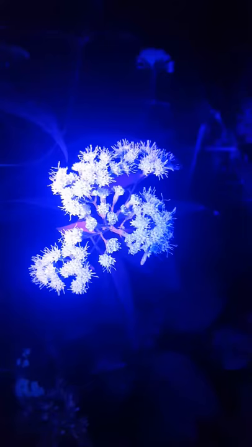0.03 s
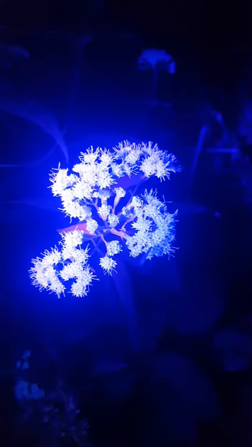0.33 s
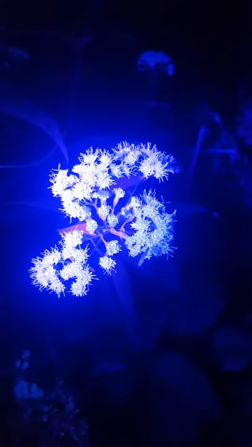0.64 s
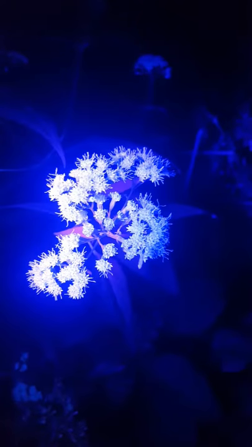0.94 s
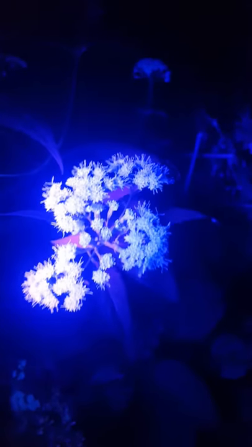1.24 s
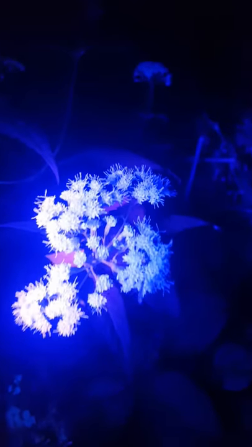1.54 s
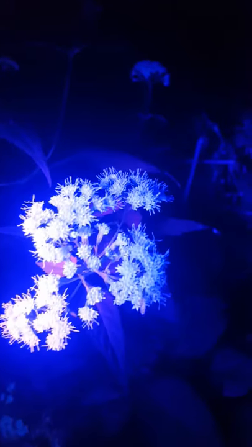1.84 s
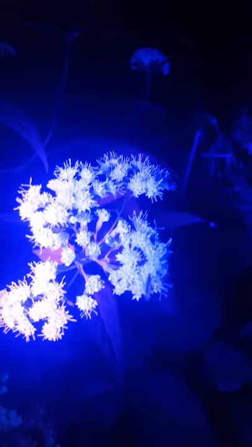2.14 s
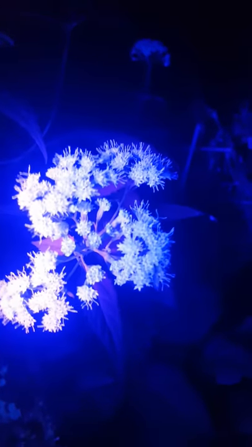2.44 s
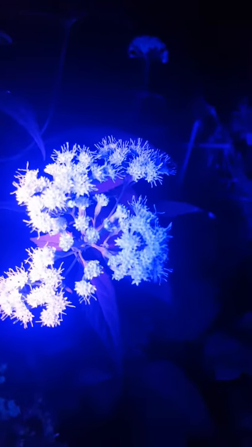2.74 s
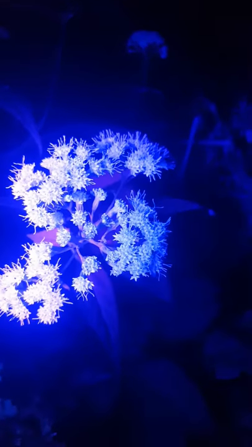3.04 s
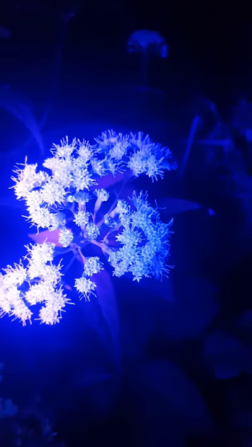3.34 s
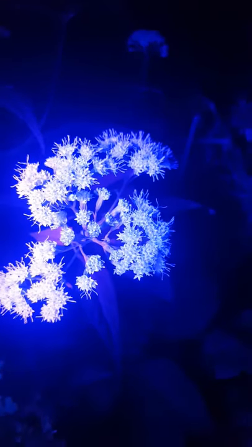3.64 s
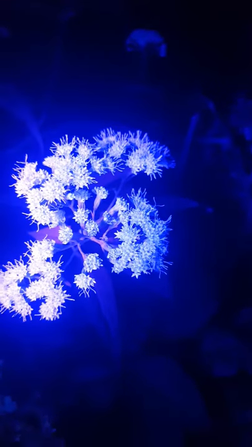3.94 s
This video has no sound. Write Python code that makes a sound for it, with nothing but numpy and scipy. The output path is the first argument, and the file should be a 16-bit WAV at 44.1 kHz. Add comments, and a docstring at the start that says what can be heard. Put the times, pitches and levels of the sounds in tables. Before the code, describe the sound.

A dense chorus of crickets trills throughout, over a faint hiss of katydids and a low rumble of distant traffic. Nearer crickets add brief trills, mostly on the left, from about 0.3 to 1.7 seconds, 2.3 to 3.1, and after 3.5. A katydid ticks three times around 2 seconds, then buzzes thinly until near the end. Another scrapes briefly at 1.3 and 2.9 seconds. Soft taps dot the leaves.

```python
"""Two crowds of crickets trill in the night: tree crickets near 2.7 kHz, ground crickets near 5 kHz.
Each stroke of their wings makes a short tone, and nearer crickets stand out in brief trills.
A meadow katydid scrapes its wings near 12 kHz: it buzzes, rests, ticks three times and buzzes again.
Another katydid lisps twice, and soft taps sound among the leaves, which scatter the nearer sounds.
Far katydids hiss all the while, and distant traffic rumbles underneath."""
import sys
import numpy as np
from scipy import signal
from scipy.io import wavfile

SR = 44100
rng = np.random.default_rng(int(sys.argv[2]) if len(sys.argv) > 2 else 0)


def materialize(psi):
    """Save the field psi as 16-bit PCM at rate SR to the path in sys.argv[1].

    A 1-D psi becomes a single channel; in a 2-D psi each row is a channel.
    """
    bounded = np.clip(np.atleast_2d(psi).T, -1, 1)
    quanta = np.round(bounded * 32767).astype(np.int16)
    wavfile.write(sys.argv[1], SR, quanta)


N = 176400
T = np.arange(N) / SR

# How loud each cricket crowd is across its pitches: f/Hz, relative level/dB
TREE_CROWD = [(2230, -15), (2310, -7), (2420, -2.5), (2550, -2.5), (2720, -2), (2900, -4), (3080, -5.5),
              (3250, -8.5), (3350, -12.5)]
GROUND_CROWD = [(4000, -36.5), (4250, -19.5), (4450, -16.5), (4650, -7), (4830, -4), (5050, -1.5),
                (5250, -1.5), (5550, -5.5), (5800, -16.5), (6000, -16), (6350, -17.5), (6600, -28),
                (6950, -31)]
# Steady crickets: f/Hz, strokes/Hz, level/dB, pan/dB (left minus right), phase wander/rad
SINGERS = [(2422, 60, -58.5, -7, 1.5), (2720, 60.5, -49.5, -5, 1.7), (3121, 43, -60.5, -3, 1.2),
           (3215, 94, -58.5, -6, 1.1), (5170, 69, -54, -9, 2.2), (6385, 50, -67, -6, 1.5),
           (6765, 45, -74, 3, 1.7)]
# The meadow katydid's buzzes: start t/s, end t/s, rise t/s, level/dB
BUZZES = [(-.3, 0.203, .1, -57), (2.118, 3.85, 0.25, -57.5)]
# Its single ticks: t/s, level/dB
TICKS = [(1.974, -53), (2.052, -52), (2.142, -52.5)]
# Where its wing rings: f/Hz, width/Hz, relative level/dB, depth of pulsing (0-1)
WING_RINGS = [(11960, 400, -6.5, 0.2), (12450, 1100, -4, 0), (13500, 1600, -10, 0)]
# Tone colour of the far katydids' hiss: f/Hz, relative level/dB
HISS_COLOUR = [(7000, 16), (7600, -29), (8300, -7.5), (9000, -24), (9800, -5), (10800, 4), (11800, 3.5),
               (12600, -1), (13600, 0), (15000, -3), (15900, -10)]
# Its loudness over time: t/s, level/dB
HISS_LEVEL = [(0, -61), (.5, -66), (1, -64.5), (1.5, -63), (1.85, -65.5), (2.5, -65), (3.7, -67), (4, -64)]
# Which way hiss and lisps lean: f/Hz, pan/dB
HISS_PAN = [(7500, 17), (9500, -7), (11000, -2), (12000, 0), (13000, 4), (15500, 4)]
# Tone colours of night air, traffic rumble and a swell of traffic: f/Hz, relative level/dB
AIR_COLOUR = [(200, -17.5), (290, -1.5), (390, -5), (580, -1.5), (940, -6.5), (1500, -9), (2100, -12.5),
              (3600, -10.5), (5000, -40), (7000, -54)]
RUMBLE_COLOUR = [(20, -33), (32, -37), (48, -9), (64, -5.5), (95, 4), (124, -9), (146, -0.5), (177, -10.5),
                 (240, -21.5)]
SWELL_COLOUR = [(170, 7), (250, 1), (400, 2.5), (560, -6.5)]
# Loudness of rumble and swell over time: t/s, level/dB
RUMBLE_LEVEL = [(0, -46.5), (.5, -46.5), (1.6, -46), (1.8, -49), (2.25, -45), (3, -44), (4, -45)]
SWELL_LEVEL = [(0, -59.5), (1.55, -58.5), (1.7, -52), (1.8, -63), (2.9, -78), (3.2, -59), (3.75, -56.5),
               (4, -60)]
# Which way air and traffic noise lean: f/Hz, pan/dB
LOW_PAN = [(30, 2.5), (130, -2), (250, 0), (500, 1), (1000, -1.5), (4000, -7)]
# How alike noise is at the two ears: f/Hz, likeness (0-1)
EAR_LIKENESS = [(30, 0.98), (130, 0.98), (250, 0.68), (500, 0.65), (1000, 0.12), (2500, .05),
                (15000, 0.084)]
# The drones of two distant engines: t/s, f/Hz, level/dB
LOW_ENGINE = [(0, 120, -46.5), (1.1, 120.6, -56.5), (1.35, 122.9, -48.5), (1.8, 123, -57),
              (2.25, 121, -47.5), (2.8, 120, -48), (3.2, 113, -48.5), (3.75, 107, -50), (4, 99.4, -52)]
HIGH_ENGINE = [(0, 158.9, -51), (.5, 166, -51.5), (1, 171.5, -55.5), (1.7, 164.4, -59), (2.3, 162, -84),
               (2.8, 153.5, -59), (4, 153.3, -66)]
# A farther cricket's low chirps, and near crickets' trills: start t/s, length/s, f/Hz, level/dB, pan/dB
CHIRPS = [(0.294, .32, 4120, -57.5, -4), (.73, 0.44, 4360, -56, 5), (1.305, .4, 4250, -61, -1),
          (1.87, .42, 4100, -59, -5), (2.402, .42, 4340, -55, 8), (2.93, 0.3, 4260, -58, -9)]
TRILLS = [(.31, 0.29, 4940, -46, -13), (0.63, 0.41, 4920, -40.5, -10), (1.03, 0.27, 4840, -45, -15),
          (1.298, 0.4, 5000, -38.5, -6), (1.37, .31, 4890, -53, -8), (1.34, 0.35, 4520, -51, -1),
          (2.268, 0.39, 4830, -44, -10), (2.416, 0.3, 4960, -40, -6), (2.68, 0.41, 4930, -46, -10),
          (3.55, 0.46, 5035, -41, -19), (3.745, 0.35, 4830, -45, -1)]
# Soft taps among the leaves: t/s, f/Hz, level/dB
TAPS = [(1.155, 1650, -58), (1.617, 1410, -56), (2.03, 870, -48.5), (2.197, 790, -50), (2.326, 1150, -55),
        (3.016, 705, -49), (3.035, 970, -62), (3.553, 1560, -54), (3.952, 11840, -62.5)]
# The second katydid's lisps: peak t/s, relative level/dB
LISPS = [(1.349, -47), (2.923, -45.5)]
# Their tone colour: f/Hz, relative level/dB
LISP_COLOUR = [(5500, -25), (7000, -3), (7900, 0), (9000, -5), (10200, -2), (11800, -1), (12800, -6),
               (14000, -16), (15500, -24)]


def from_db(db):
    """Turn decibels into a number to multiply by."""
    return 10 ** (np.asarray(db) / 20)


def rms_one(x):
    """Scale a signal so that its typical size (rms) is 1."""
    return x / np.sqrt(np.mean(x ** 2) + 1e-20)


def in_time(rows):
    """Join a table's points with straight lines: one curve for each column after the time."""
    times, *columns = np.transpose(rows)
    return [np.interp(T, times, column) for column in columns]


def at_hz(rows, hz):
    """Look up a table's value at one pitch, with octaves evenly spaced."""
    pitches, values = np.transpose(rows)
    return np.interp(np.log(hz), np.log(pitches), values)


def drift(rate_hz):
    """A smooth random wobble of size about 1; a higher rate wobbles faster."""
    step, warm_up = 40, 2000
    r = np.exp(-2 * np.pi * rate_hz * step / SR)
    noise = rng.standard_normal(N // step + warm_up + 2)
    slow = signal.lfilter([1], [1, -2 * r, r * r], noise)[warm_up:]
    return np.interp(np.arange(N) / step, np.arange(len(slow)), rms_one(slow))


def panned(pan_db):
    """Lean a sound left (+) or right (-), keeping its total power."""
    return rms_one(from_db([[pan_db / 2], [-pan_db / 2]]))


def gate(start, end, rise=.08, fall=.08):
    """Fade in, hold and fade out; times are in seconds."""
    return np.clip((T - start) / rise, 0, 1) * np.clip((end - T) / fall, 0, 1)


def blip(peak_s, width_s):
    """A quick, bell-shaped rise and fall."""
    return np.exp(-.5 * ((T - peak_s) / width_s) ** 2)


def ring(x, hz, width_hz, edge_cut=1):
    """Make x ring around one pitch; an edge_cut of 1 removes the very lowest and highest pitches."""
    r = np.exp(-np.pi * width_hz / SR)
    return signal.lfilter([1, 0, -edge_cut], [1, -2 * r * np.cos(2 * np.pi * hz / SR), r * r], x)


def banded_noise(colour, pan, flicker_db, bands):
    """Stereo noise made of pitch bands that each flicker on their own."""
    edges = np.geomspace(colour[0][0], colour[-1][0], bands + 1)
    white = rng.standard_normal((2, 2, N))
    out = 0
    for k, (low, high) in enumerate(zip(edges, edges[1:])):
        band = signal.butter(2, [low, high], "band", fs=SR, output="sos")
        shared, opposite = signal.sosfilt(band, white[k % 2])
        hz = np.sqrt(low * high)
        alike = at_hz(EAR_LIKENESS, hz)
        gain = from_db(at_hz(colour, hz) + flicker_db * drift(12.3)) * panned(at_hz(pan, hz))
        out += gain * (np.sqrt(1 + alike) * shared + np.sqrt(1 - alike) * opposite * [[1], [-1]])
    return rms_one(out)


def leaves(x, echo_db, decay_s=.78):
    """Countless tiny echoes off the leaves, different at each ear, fading at 60 dB per decay_s."""
    t = T[:SR // 2]
    echoes = rng.standard_normal((2, len(t))) * from_db(-60 * t / decay_s)
    echoes /= np.sqrt(np.sum(echoes ** 2, axis=1, keepdims=True))
    x = x * np.ones((2, 1))
    wet = from_db(echo_db)
    return (x + wet * signal.fftconvolve(x, echoes, axes=1)[:, :N]) / np.hypot(1, wet)


def cricket(hz, strokes_per_s, duty, sag, unsteady):
    """Each wing stroke is a short tone that sags in pitch; duty is the share of time it sounds."""
    strokes = np.cumsum(strokes_per_s * (1 + unsteady * drift(3.98))) / SR + rng.random()
    progress = np.minimum(strokes % 1 / duty, 1)
    # each stroke reaches each ear at a random point in its wave
    offsets = rng.uniform(0, 2 * np.pi, (2, N // 200))[:, strokes.astype(int)]
    phase = 2 * np.pi * np.cumsum(hz * (1 + sag * (.5 - progress))) / SR
    return rms_one(np.sin(np.pi * progress) * np.sin(phase + offsets))


def cricket_crowd(loudness, strokes_per_s, duty, sag, swell_db, count):
    """Many crickets spread over a range of pitches, each with its own tempo and slow swell."""
    out = 0
    for hz in np.linspace(loudness[0][0], loudness[-1][0], count):
        song = cricket(hz, strokes_per_s * rng.uniform(.6, 1.4), duty, sag, unsteady=.03)
        out += song * from_db(at_hz(loudness, hz) + swell_db * drift(4.1))
    return rms_one(out)


def ringing_cricket(hz, strokes_per_s, depth, wander_rad):
    """Strokes run together into one throbbing tone, whose wave shifts on the way to each ear."""
    strokes = np.cumsum(strokes_per_s * (1 + .024 * drift(5))) / SR + rng.random()
    wander = wander_rad * np.array([drift(14), drift(14)]) + rng.uniform(0, 2 * np.pi, (2, 1))
    throb = 1 + depth * np.cos(2 * np.pi * strokes)
    return rms_one(throb * np.sin(2 * np.pi * hz * T + wander))


def steady_crickets():
    """Seven throbbing singers and one ground cricket with short, crisp strokes sing without a break."""
    singers = sum(from_db(db) * panned(pan) * ringing_cricket(hz, rate, depth=.58, wander_rad=wander)
                  for hz, rate, db, pan, wander in SINGERS)
    crisp = cricket(hz=5700, strokes_per_s=67.4, duty=.45, sag=.06, unsteady=.005)
    return singers + from_db(-53) * panned(-9) * crisp


def meadow_katydid():
    """Tiny teeth strike the wing and ring it with a note and a rasp, in ticks or a slowing buzz."""
    ticks = sum(from_db(db) * blip(s, width_s=.009) for s, db in TICKS)
    buzz = sum(from_db(db) * gate(start, end, rise, fall=.021) for start, end, rise, db in BUZZES)
    strokes_per_s, slowing_per_s2 = 33.6, 1.05
    t = T - 3  # the buzz passes through that tempo at 3 s
    stroke = np.cos(2 * np.pi * (strokes_per_s * t - .5 * slowing_per_s2 * t ** 2))
    note_hz, wander = 12070, 2.1 * np.array([drift(40), drift(40)])
    note = from_db(-4.5) * rms_one(np.sin(2 * np.pi * note_hz * T + wander))
    note *= ticks + buzz * rms_one((1 + stroke) ** 2)
    rasp = 0
    for hz, width_hz, db, depth in WING_RINGS:
        wing = rms_one(ring(rng.standard_normal((2, N)), hz, width_hz))
        rasp += from_db(db) * wing * (ticks + buzz * rms_one((1 + depth * stroke) ** 2))
    rasp = signal.sosfilt(signal.butter(4, 10800, "high", fs=SR, output="sos"), rasp)
    return panned(1.5) * leaves(note + rasp, echo_db=-5.5)


def far_katydids():
    """Many far songs merge into one high hiss."""
    hiss = banded_noise(HISS_COLOUR, HISS_PAN, flicker_db=2.5, bands=12)
    return from_db(in_time(HISS_LEVEL)[0]) * hiss


def night_air():
    """A soft, even rush of air."""
    return from_db(-51) * banded_noise(AIR_COLOUR, LOW_PAN, flicker_db=1.7, bands=14)


def engine(curve, flutter_db, waver):
    """Only the firing tone of a far engine carries, fluttering on the way."""
    hz, db = in_time(curve)
    level = from_db(db + flutter_db * drift(14))
    phase = 2 * np.pi * np.cumsum(hz * (1 + waver * drift(7.44))) / SR
    return level * rms_one(np.sin(phase))


def traffic():
    """Distant traffic: a deep rumble, a swell a little above it and two droning engines."""
    rumble = banded_noise(RUMBLE_COLOUR, LOW_PAN, flicker_db=1.5, bands=10)
    rumble *= from_db(in_time(RUMBLE_LEVEL)[0])
    swell = banded_noise(SWELL_COLOUR, LOW_PAN, flicker_db=.5, bands=3)
    swell *= from_db(in_time(SWELL_LEVEL)[0])
    low_drone = engine(LOW_ENGINE, flutter_db=1.5, waver=.0282)
    high_drone = engine(HIGH_ENGINE, flutter_db=2, waver=.0094)
    return rumble + swell + low_drone + high_drone


def chirps_and_trills():
    """Short runs of wing strokes: low chirps half blend into the crowd, near trills stand clear."""
    chirps = sum(from_db(db) * panned(pan) * gate(s, s + length)
                 * cricket(hz, strokes_per_s=45, duty=.8, sag=.055, unsteady=.034)
                 for s, length, hz, db, pan in CHIRPS)
    trills = sum(from_db(db) * panned(pan) * gate(s, s + length)
                 * ringing_cricket(hz, strokes_per_s=45, depth=.45, wander_rad=1.9)
                 for s, length, hz, db, pan in TRILLS)
    return leaves(chirps + trills, echo_db=-11, decay_s=.5)


def taps():
    """Each tap is a brief, dull knock around its own pitch."""
    out = 0
    for s, hz, db in TAPS:
        knock = rng.standard_normal(N)
        for _ in range(2):
            knock = ring(knock, hz, width_hz=.43 * hz, edge_cut=1.09)
        out += from_db(db) * rms_one(knock) * blip(s, width_s=.0062)
    return leaves(out, echo_db=-8)


def lisping_katydid():
    """One quick, broad scrape of the wings at a time, trailing off among the plants."""
    rise_s, fall_s = .01, .042
    level = sum(from_db(db) * np.exp(-np.maximum((s - T) / rise_s, (T - s) / fall_s)) for s, db in LISPS)
    scrape = banded_noise(LISP_COLOUR, HISS_PAN, flicker_db=7.5, bands=8)
    return from_db(-2.5) * leaves(level * scrape, echo_db=-5, decay_s=1)


def scene():
    """All the insects over the distant traffic."""
    tree = cricket_crowd(TREE_CROWD, strokes_per_s=32, duty=.96, sag=.0153, swell_db=1.2, count=26)
    ground = cricket_crowd(GROUND_CROWD, strokes_per_s=48, duty=.94, sag=.025, swell_db=.5, count=44)
    crowds = from_db(-44.5) * panned(-2) * tree + from_db(-39) * panned(-1.5) * ground
    return (crowds + steady_crickets() + meadow_katydid() + far_katydids() + night_air() + traffic()
            + chirps_and_trills() + taps() + lisping_katydid())


def record(dry):
    """The sound starts suddenly, then grows to full level; the highest treble is cut."""
    start_s, grow_s, cutoff_hz = .07, .68, 15650
    opening = np.clip((T - start_s) / .0019, from_db(-63), 1)
    growth = from_db(-4 * np.clip(1 - (T - start_s) / grow_s, 0, 1))
    treble_cut = signal.ellip(12, .1, 80, cutoff_hz, fs=SR, output="sos")
    return signal.sosfilt(treble_cut, dry * opening * growth)


dry = scene()
out = record(dry)
materialize(out)
```